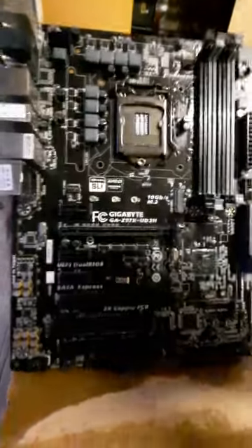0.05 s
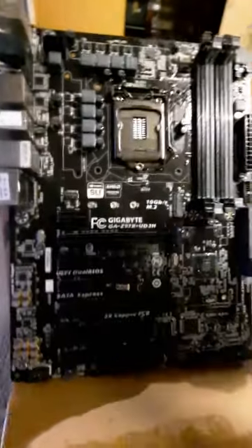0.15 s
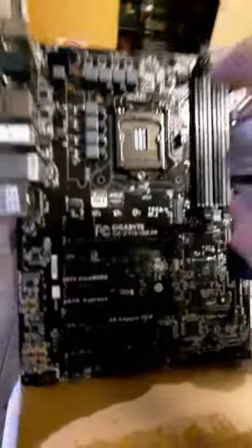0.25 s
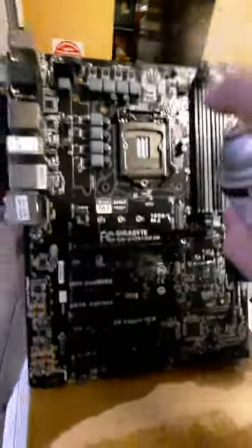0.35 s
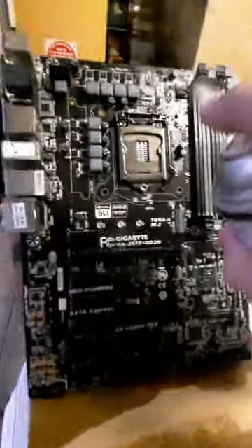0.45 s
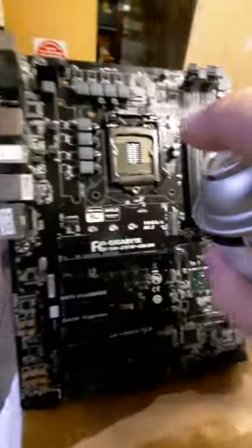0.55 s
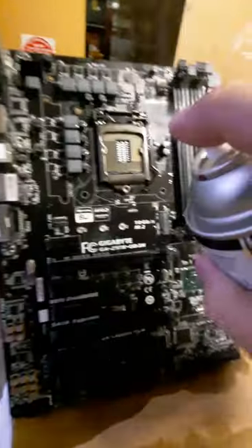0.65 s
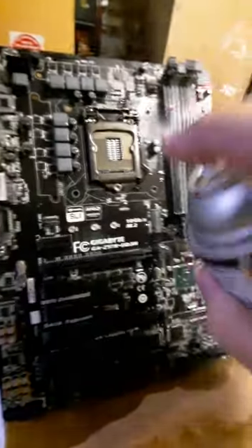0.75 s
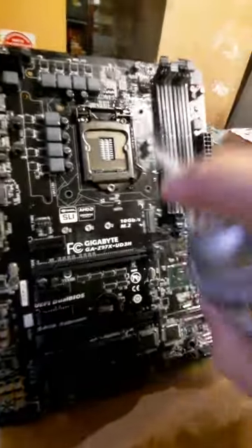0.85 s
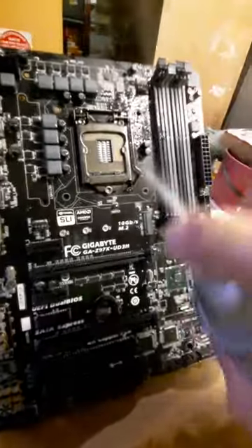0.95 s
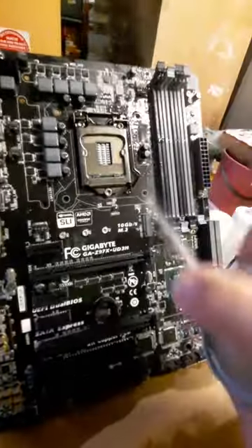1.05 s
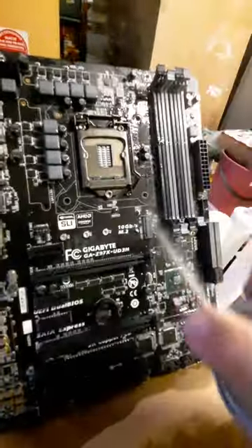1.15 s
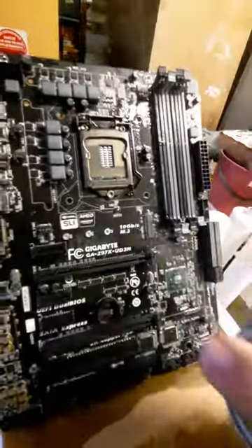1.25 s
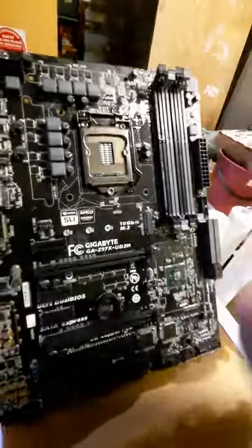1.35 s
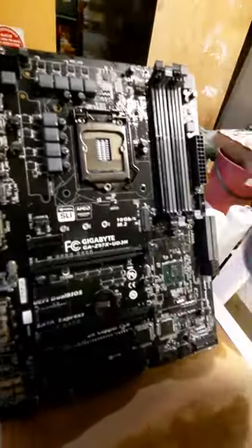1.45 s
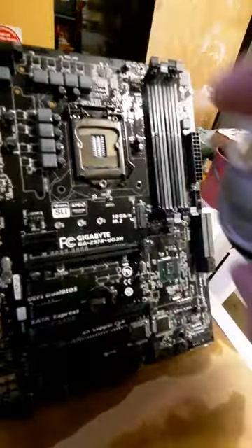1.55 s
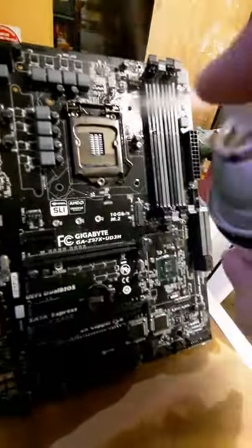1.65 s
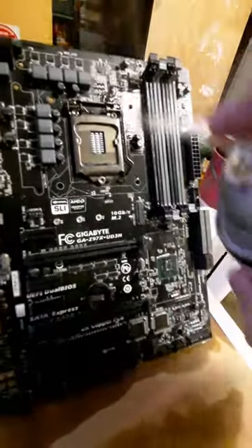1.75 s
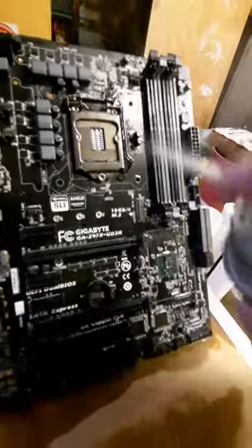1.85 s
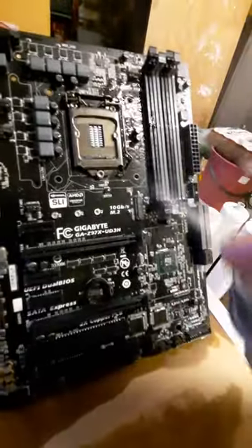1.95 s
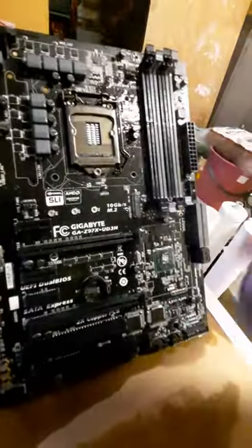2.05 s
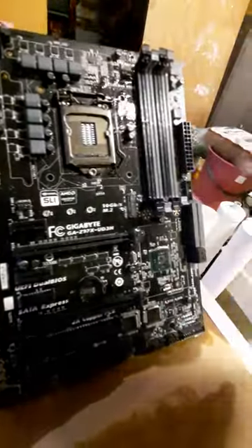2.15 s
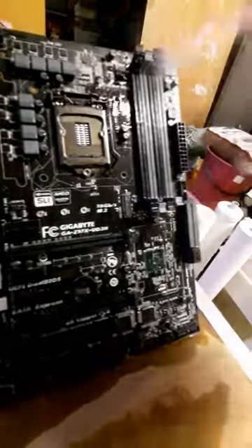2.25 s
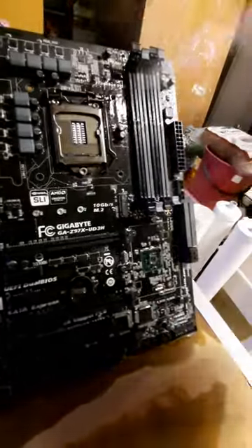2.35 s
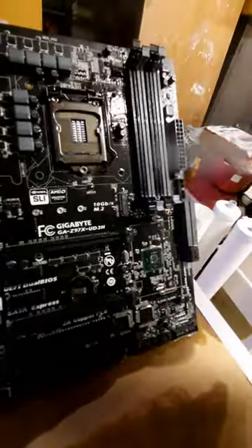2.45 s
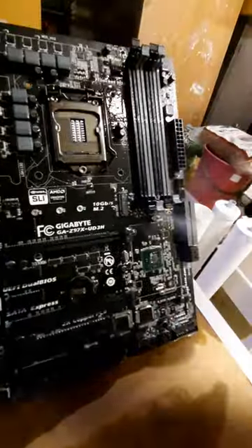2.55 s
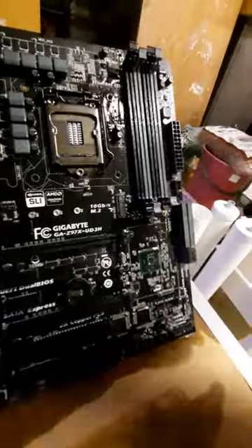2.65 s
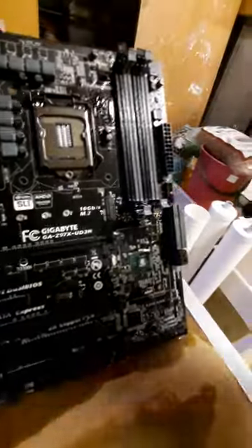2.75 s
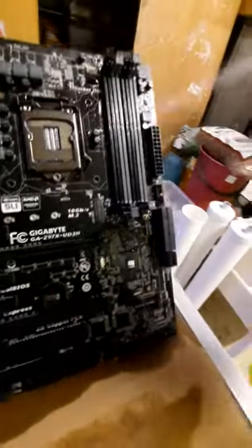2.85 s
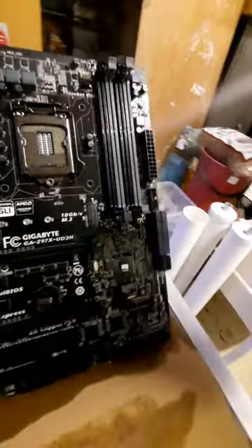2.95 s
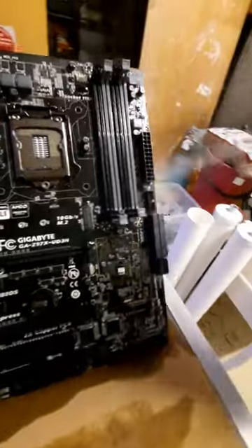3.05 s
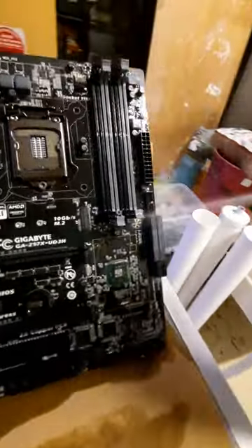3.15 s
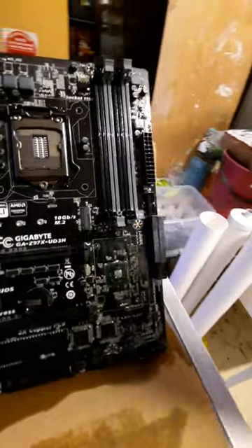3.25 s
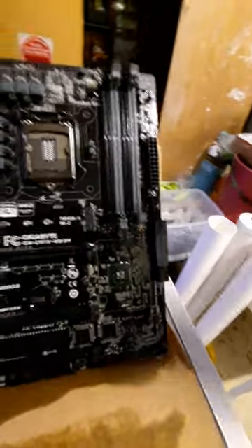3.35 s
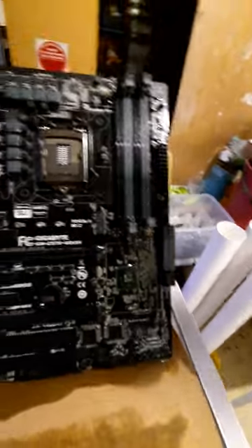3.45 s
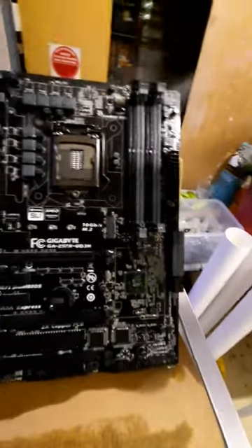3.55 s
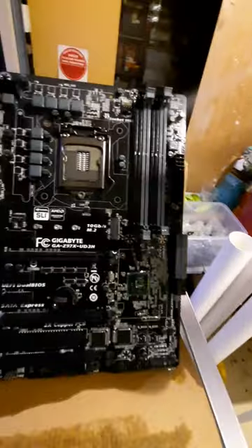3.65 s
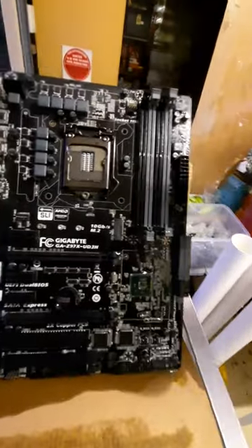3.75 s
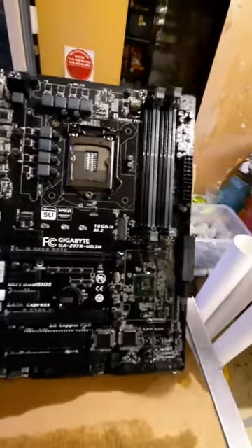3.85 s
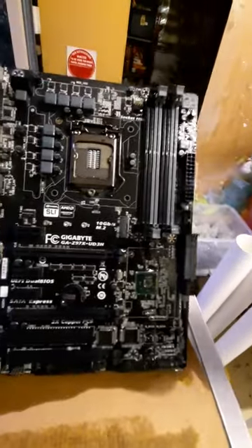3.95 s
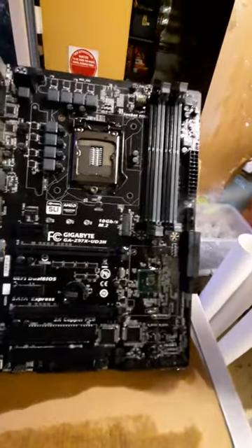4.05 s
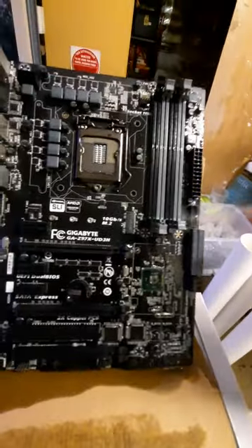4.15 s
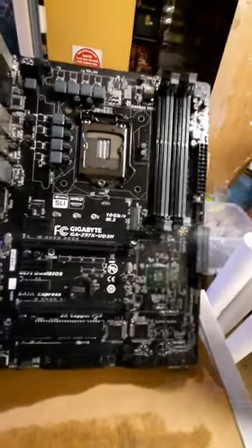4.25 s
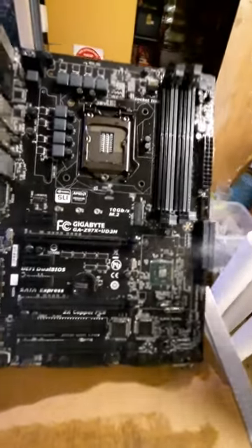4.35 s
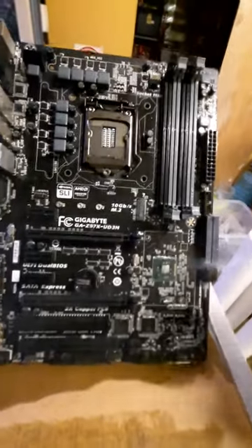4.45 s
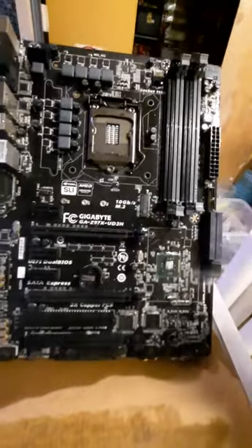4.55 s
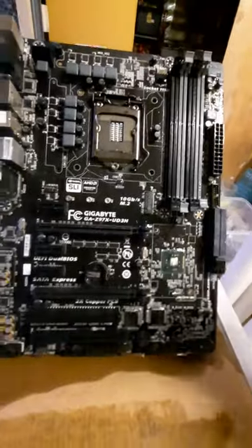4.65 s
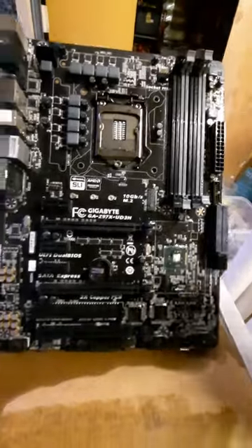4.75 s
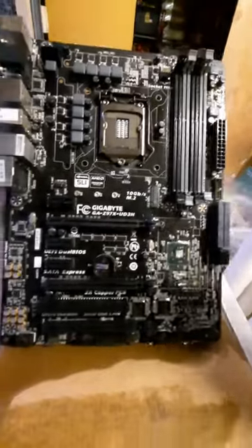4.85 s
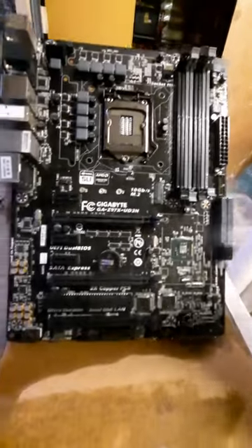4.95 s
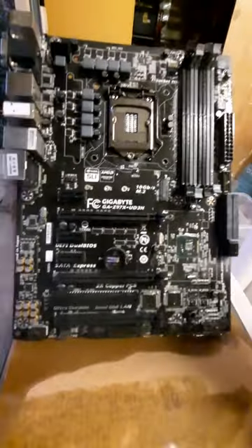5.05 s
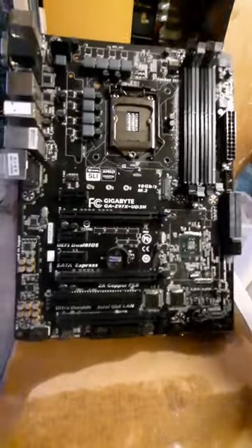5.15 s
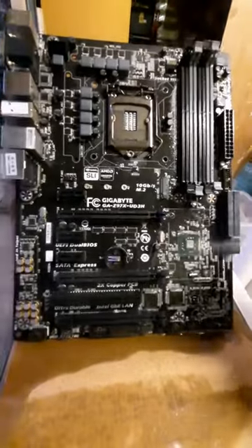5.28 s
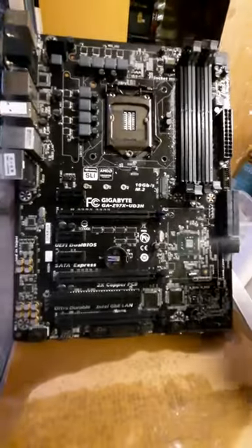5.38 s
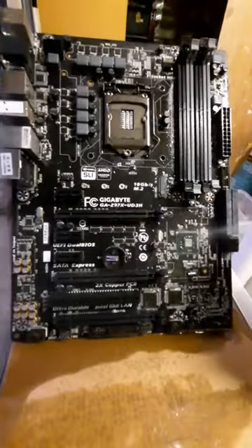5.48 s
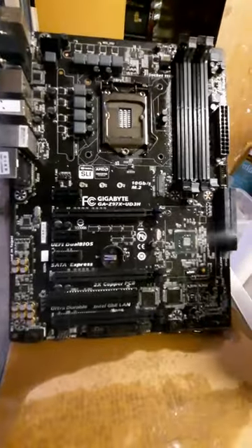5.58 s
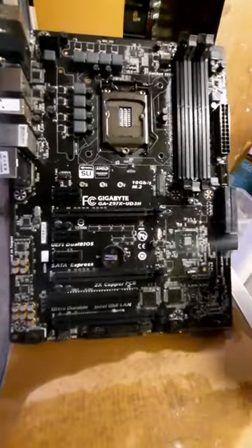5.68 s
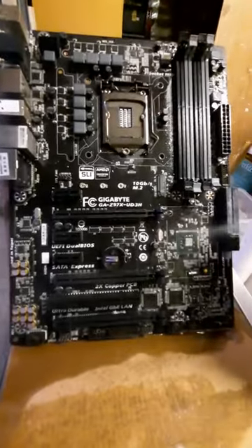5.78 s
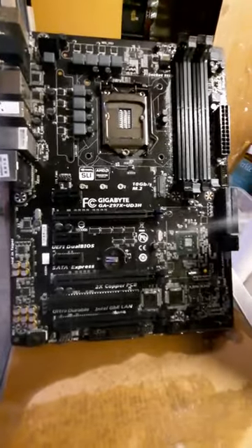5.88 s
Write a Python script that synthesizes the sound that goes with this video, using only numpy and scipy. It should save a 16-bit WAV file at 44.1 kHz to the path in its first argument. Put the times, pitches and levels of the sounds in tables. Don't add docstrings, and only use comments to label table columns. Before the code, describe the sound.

A small indoor workshop, heard closely on a phone in stereo. Soft hum and a dull can knock open the scene, with a sharp button tick at 0.06 s. A tiny puff at 0.26 s runs straight into a long, bright, gritty hiss until 1.26 s. Further bursts follow at about 1.6-2.0 and 2.25-2.6 s, the latter ending in a faint leak and a small distant chirp. Another burst runs 2.9-3.2 s; low and thin squeaks and several clicks fill the pause around 3.2-3.5 s. A long spray lasts 3.55-4.6 s, with a wavering far squeak around 4.0-4.2 s and a reply at 4.55-4.8 s. A short burst comes at 4.83-5.08 s, a click at 5.2 s, then sustained spray from 5.23 s to the end. The airy treble leans right; tone shifts, droplets drum the board, and muffled hand bumps rumble underneath while the background hum quietens.

```python
import sys
import numpy as np
from scipy import signal
from scipy.io import wavfile
from scipy.ndimage import uniform_filter1d, map_coordinates

SR = 44100
rng = np.random.default_rng(int(sys.argv[2]) if len(sys.argv) > 2 else 0)


def ratio_of_db(decibels):
    return 10 ** (np.asarray(decibels, float) / 20)


def inscribe(sig):
    pcm = np.round(np.clip(np.atleast_2d(sig).T, -1, 1) * 32767)
    wavfile.write(sys.argv[1], SR, pcm.astype(np.int16))


N = 261072
T = np.arange(N) / SR
FRAME = 1024
TOP_HZ = 15750

# (open [s], shut [s], opening time [s], flow [dB])
VALVE_OPENINGS = [
    (0.256, 0.287, 0.021, -12),
    (0.285, 1.257, 0.013, -2),
    (1.581, 2.026, 0.022, -0.5),
    (2.25, 2.587, 0.019, -1),
    (2.577, 2.645, .01, -42),
    (2.868, 3.199, 0.018, -0.5),
    (3.55, 4.584, 0.0086, -1),
    (4.832, 5.075, 0.019, -1.5),
    (5.226, 6.5, 0.0076, -1.5),
]
# (frequency [Hz], density [dB per Hz])
SPRAY_SPECTRUM = [(24, -66), (40, -16), (136, -20), (209, -22.5), (311, -10.5), (539, -16), (710, -11),
                  (1060, -13.5), (2140, -8.5), (4200, -10.5), (5960, -6), (9580, -12.5), (12000, 2),
                  (14700, -2.5), (15800, -4)]
# (frequency [Hz], left minus right [dB])
SPRAY_BALANCE = [(200, 0.5), (400, 0), (700, 9), (1300, 5.5), (2400, 0), (4400, 0), (6000, -9.5),
                 (8100, -21), (10000, -19.5), (12000, -12.5), (15000, -4.5)]
# (frequency [Hz], likeness of the channels [-])
SPRAY_COHERENCE = [(200, 1), (600, 1), (1400, 0.54), (3500, 0.49), (6000, 0.33), (9000, 0.39),
                   (12000, 0.44), (15000, 0.3)]
ZONE_CENTRES = [500, 2200, 6000, 12500]
# (time [s], nearness [dB], jet turned to the phone [dB], right port lag [samples])
HAND_PATHS = [
    [(.31, -33, -1, 13.8), (.5, -31, -1, 9.8), (.67, -30, -3.5, 6.1), (.86, -28.5, 0.5, 6.4),
     (1.08, -27.5, -2, 5.5), (1.25, -28, -4.2, 4.6)],
    [(1.61, -32, -3.5, 7.8), (1.8, -30.5, -1, 7.8), (2.03, -32, 0.5, 7.1)],
    [(2.28, -30.5, -5.5, 8.3), (2.42, -30, -6, 9.6), (2.59, -31, 2.5, 4.8)],
    [(2.9, -34.5, -3.5, 10.8), (3.02, -34.5, 0.8, 8.5), (3.2, -35, 4.5, 2.3)],
    [(3.58, -36, 0, 10.3), (3.82, -36.5, 6.5, 7.2), (4.01, -33, 0.5, 4.5), (4.12, -36.5, 8, 3.3),
     (4.28, -35, 4, 3), (4.45, -36.5, 9, 1.7), (4.56, -36, 14, 1.2)],
    [(4.86, -35.5, 3, 5.6), (4.96, -37.5, 10, 4), (5.07, -34.5, 5.5, 1.7)],
    [(5.25, -36, 2, 2), (5.4, -33, -0.8, 2.6), (5.65, -35, 4.5, 2.6), (5.92, -37.5, 7, 2.6)],
]
# (board pocket [Hz], nozzle cup [Hz], jet [Hz])
RESONANCES = [(2090, 6700, 16000), (2570, 6400, 20000), (2410, 6070, 14800), (2280, 5640, 9500),
              (2130, 5660, 10000), (2190, 5400, 12700), (2670, 6560, 13400)]
# (width [octaves], lift [dB])
RESONANCE_PEAKS = [(0.12, 2), (0.089, 4), (0.36, 2.5)]
# (time [s], half width [s], drumming [dB])
BOARD_SPLASHES = [(.65, 0.05, 8.5), (1.07, 0.035, 4.5), (1.24, .03, 1), (1.66, .06, 3), (1.98, 0.049, 4.5),
                  (2.56, 0.051, 1), (3.0, 0.059, 3.5), (3.19, 0.042, 10), (3.78, 0.15, 5.5),
                  (4.01, 0.066, 3.5), (4.2, 0.083, 10), (4.92, 0.16, 5.5), (5.65, 0.38, -3.5),
                  (3.62, .06, -2), (4.5, 0.059, -0.5)]
# (time [s], peak [dB], ring [Hz], T60 [s], left minus right [dB])
BUTTON_TICKS = [(.0613, -39.5, 6740, 0.03, -23), (2.85, -55, 5000, .012, -5), (3.348, -55, 4050, .03, 3),
                (3.468, -50, 11100, 0.042, -20), (3.481, -42.5, 5850, 0.043, -17),
                (3.536, -35, 5200, 0.022, -7), (4.82, -50, 9000, .02, -12),
                (5.214, -45.5, 5000, 0.045, -19)]
# (time [s], peak [dB], ring [Hz], T60 [s], left minus right [dB])
CAN_KNOCKS = [(0.021, -30, 247, 0.087, -0.5), (0.031, -36, 169, 0.11, 4)]
# (time [s], half width [s], deep [dB], upper [dB])
HAND_BUMPS = [(.04, 0.042, 4, 2), (.47, 0.09, 12.5, 7), (.86, 0.041, 5, 2), (1.85, 0.11, 5, 3.5),
              (2.97, 0.091, 6, 7), (3.83, 0.082, 7, 8), (4.14, 0.14, 11, 5.5), (4.4, .04, 5, 1),
              (4.57, 0.043, 1.5, 12), (4.95, 0.035, 2, 4.5), (5.5, 0.057, -3, 4)]
# (time [s], pitch [Hz], level [dB])
FAR_SQUEAKS = [
    [(2.604, 1860, -58), (2.62, 1910, -41), (2.655, 2120, -48), (2.672, 2030, -58), (2.69, 2110, -51),
     (2.73, 2050, -62)],
    [(2.606, 2440, -56), (2.65, 2440, -49), (2.685, 2440, -62)],
    [(3.33, 3100, -64), (3.372, 3122, -50), (3.506, 3210, -48), (3.55, 3260, -56)],
    [(3.91, 2560, -48), (3.96, 2540, -45), (4.04, 2350, -38), (4.065, 2330, -45), (4.085, 2470, -41),
     (4.125, 2620, -46), (4.166, 2437, -37), (4.2, 2270, -40), (4.23, 2212, -55)],
    [(4.425, 2420, -46), (4.46, 2290, -44), (4.535, 2290, -54)],
    [(4.54, 2470, -50), (4.575, 2570, -39), (4.605, 2450, -45), (4.65, 2570, -40), (4.69, 2500, -47),
     (4.755, 2530, -52), (4.775, 2500, -64), (4.84, 2538, -66)],
]
# (time [s], pitch [Hz], level [dB])
FAR_LOW_SQUEAK = [(3.22, 1420, -66), (3.234, 1500, -51), (3.358, 1556, -67), (3.408, 1500, -67),
                  (3.42, 1480, -80)]
# (frequency [Hz], density [dB per Hz])
SHOP_SPECTRUM = [(18, -40), (30, -8), (137, -13), (174, -28), (232, -19.5), (301, -5), (680, -9),
                 (735, -7.5), (838, -4.5), (1490, -6), (1790, -6), (4980, -23), (6480, -21.5), (9600, -29),
                 (15800, -31)]
# (frequency [Hz], left minus right [dB])
SHOP_BALANCE = [(60, 12), (380, -1.5), (700, 3), (1300, -2), (2400, 4.5), (4400, 2), (6000, -10),
                (8000, -22), (15000, -25)]
# (frequency [Hz], likeness of the channels [-])
SHOP_COHERENCE = [(60, 1), (130, 0.77), (290, 1), (640, 0.46), (1410, -0.07), (3100, -1.4), (6820, -0.84),
                  (15000, -0.31)]
# (time [s], level [dB])
SHOP_LOUDNESS = [(0, -42), (1.4, -42.5), (3.5, -45.5), (4.75, -50)]

FACING_SHARE = 0.29, 0.26, .01, 0.89
SPLASH_SHARE = 1.12, 0.23, .01, .01
ZONE_DB = 0.25, 2.8, 3.24, 0.46
MID_LAG = 7.04


def spray():
    hz, s = frame_axes()
    near, facing, bearing = can_position(s)
    zones = near + np.outer(FACING_SHARE, facing) + np.outer(SPLASH_SHARE, swells(s, BOARD_SPLASHES))
    zones = zones + np.array(ZONE_DB)[:, None]
    blend = [np.interp(np.log(hz + 1), np.log(ZONE_CENTRES), w) for w in np.eye(4)]
    db = on_hz(SPRAY_SPECTRUM, hz)[:, None] + np.transpose(blend) @ zones + resonances(hz, s) + 10.41
    slow_tint = 3.38 * patches((2,) + db.shape, frames=14, bins=7)
    quick_tint = 1.09 * patches((2,) + db.shape, frames=3, bins=50)
    treble = np.clip(hz / 12000, 0, 1)[:, None]
    pan_db_per_lag = treble * 0.37 + (1 - treble) * 0.4
    balance = on_hz(SPRAY_BALANCE, hz)[:, None] + pan_db_per_lag * (bearing - MID_LAG)
    drops = ratio_of_db(np.repeat(rng.exponential(size=N // 24 + 1), 24)[:N])
    source = rng.standard_normal((2, N)) * drops / np.sqrt(np.mean(drops ** 2))
    jet = stereo_noise(db + slow_tint + quick_tint, balance, on_hz(SPRAY_COHERENCE, hz), source)
    return reflections(jet) * valve_flow()


def valve_flow(spit=0.072, spit_s=0.038, shut_s=0.013):
    flow = np.zeros(N)
    for start, stop, rise, db in VALVE_OPENINGS:
        surge = 1 + spit * np.exp(-np.abs(T - start) / spit_s)
        opening = np.clip((T - start) / rise, 0, 1)
        closing = np.exp(-np.clip(T - stop, 0, None) / shut_s)
        flow += ratio_of_db(db) * surge * opening * closing
    return flow


def can_position(s):
    rows = np.concatenate(HAND_PATHS)
    return [np.interp(s, rows[:, 0], column) for column in rows[:, 1:].T]


def resonances(hz, s):
    burst = np.clip(np.searchsorted([path[0][0] for path in HAND_PATHS], s + .1) - 1, 0, None)
    bearing = can_position(s)[2] - MID_LAG
    slides = 0.012, -0.0061, 0.011
    lift = 0
    for centre, slide, (width, db) in zip(np.array(RESONANCES)[burst].T, slides, RESONANCE_PEAKS):
        octaves = np.log2((hz[:, None] + 1) / (centre * (1 + slide * bearing)))
        lift = lift + db * np.exp(-.5 * (octaves / width) ** 2)
    return lift


def reflections(x, share=0.15, sway=.1):
    drift = patches((8, 1, N // 441 + 1), frames=50, bins=1)[:, 0]
    drift_s = np.arange(drift.shape[1]) / 100
    out = x.copy()
    for k, delay_ms in enumerate((.27, .43, .61, .95, 1.3, 1.9, 2.6, 3.4)):
        lag = delay_ms * (1 + sway * np.interp(T, drift_s, drift[k])) * SR / 1000
        out[k % 2] += share * late(x[k % 2], lag)
    out[1] = late(out[1], can_position(T)[2])
    return out


def taps(touch_s=0.0012):
    out, t = np.zeros((2, N)), T[:4096]
    for s, db, hz, t60, pan_db in BUTTON_TICKS + CAN_KNOCKS:
        edges = [hz * 0.61, min(hz * 1.54, 15500)]
        sos = signal.butter(2, edges, "band", fs=SR, output="sos")
        scratch = signal.sosfilt(sos, rng.standard_normal(4096))
        decay = np.exp(-np.log(1000) * t / max(t60, .005)) * np.clip(t / touch_s, 0, 1)
        ring = (0.27 * np.sin(2 * np.pi * hz * t) + 0.23 * scratch / scratch.std()) * decay
        at = int(s * SR)
        out[:, at:at + 4096] += ratio_of_db(db + np.array([[pan_db], [-pan_db]]) / 2) * ring
    return out


def rumble(side=0.16):
    flow = np.clip(uniform_filter1d(valve_flow(), size=2205), 0, 1)
    sway = np.repeat(patches((2, 1, N // 441 + 1), frames=8, bins=1)[:, 0], 441, axis=1)[:, :N]
    bumps = swells(T, HAND_BUMPS)
    out = 0
    for k, (edges, drone_db, spray_db) in enumerate((((50, 110), -71.5, 1), ((110, 192), -72, 7.5))):
        db = drone_db + spray_db * flow + bumps[k] + 2 * uniform_filter1d(sway[k], size=441)
        mid, odd = band(rng.standard_normal((2, N)), *edges)
        out = out + ratio_of_db(db) * (mid + side * odd * np.array([[1], [-1]])) / mid.std()
    return out


def squeaks(rough_db=3, wobble=.0025, boost=.4):
    out = np.zeros(N)
    shake = patches((3, 1, N), frames=450, bins=1)[:, 0]
    for rows in FAR_SQUEAKS + [FAR_LOW_SQUEAK]:
        s, hz, db = np.transpose(rows)
        fade = np.clip(np.minimum(T - s[0], s[-1] - T) / 0.0085, 0, 1)
        low = 1700 < hz.mean() < 2300
        force = np.clip((db.max() + 54.5) / 10 + low, 0, 1)
        pitch = np.interp(T, s, hz) * (1 + wobble * (1 + 2 * force) * shake[0])
        tone = np.sin(2 * np.pi * np.cumsum(pitch) / SR)
        fluttering = tone * (1 + boost * force * ratio_of_db(rough_db * shake[2]))
        out += fade * ratio_of_db(np.interp(T, s, db) + rough_db * shake[1]) * fluttering
    return out


def room(x, t60_s=0.24):
    t = T[:SR // 2]
    hiss = rng.standard_normal((2, len(t)))
    dull = signal.sosfilt(signal.butter(1, 5000, fs=SR, output="sos"), hiss)
    tail = dull * np.exp(-np.log(1000) * t / t60_s)
    tail += (hiss - dull) * np.exp(-np.log(1000) * t / (0.3 * t60_s))
    tail *= t > .004
    tail /= np.sqrt(np.sum(tail ** 2, axis=1, keepdims=True))
    return signal.fftconvolve(x, tail, axes=1)[:, :N]


def shop():
    hz, s = frame_axes()
    db = on_hz(SHOP_SPECTRUM, hz)[:, None] + 2 * patches((2, len(hz), len(s)), frames=6, bins=12)
    balance = on_hz(SHOP_BALANCE, hz)[:, None]
    x = stereo_noise(db, balance, on_hz(SHOP_COHERENCE, hz), rng.standard_normal((2, N)))
    return x / x.std() * ratio_of_db(np.interp(T, *np.transpose(SHOP_LOUDNESS)) - 3.5)


def stereo_noise(db, balance_db, coherence, source):
    z = signal.stft(source, SR, nperseg=FRAME)[2]
    c = np.clip(coherence, 0, .99)[:, None]
    mid, side = z[0] * np.sqrt((1 + c) / 2), z[1] * np.sqrt((1 - c) / 2)
    lean = ratio_of_db(balance_db)
    share = np.sqrt(2 / (1 + lean ** 2))
    pair = np.array([(mid + side) * lean * share, (mid - side) * share])
    return signal.istft(pair * ratio_of_db(db), SR, nperseg=FRAME)[1][:, :N]


def frame_axes():
    return signal.stft(np.zeros(N), SR, nperseg=FRAME)[:2]


def on_hz(table, hz):
    f, v = np.transpose(table)
    return np.interp(np.log(np.maximum(hz, 1)), np.log(f), v)


def patches(shape, frames, bins):
    z = rng.standard_normal(shape)
    for _ in range(2):
        z = uniform_filter1d(uniform_filter1d(z, size=frames, axis=-1), size=bins, axis=-2)
    return z / z.std()


def swells(s, rows):
    rows = np.array(rows)
    return rows[:, 2:].T @ np.exp(-.5 * ((s - rows[:, :1]) / rows[:, 1:2]) ** 2)


def band(x, low_hz, high_hz):
    return signal.sosfilt(signal.butter(3, [low_hz, high_hz], "band", fs=SR, output="sos"), x)


def late(x, lag):
    return map_coordinates(x, [np.arange(N) - lag], order=3)


def scene():
    near = band(spray(), 193, 19000) + taps()
    squeak = squeaks()
    far = np.array([ratio_of_db(4.5) * squeak, ratio_of_db(-3.5) * late(squeak, 2)])
    direct = near + ratio_of_db(.5) * far
    echoes = ratio_of_db(-13.5) * room(near) + ratio_of_db(-6) * room(far)
    return direct + echoes + band(shop(), 150, 21000) + rumble()


def starve(x, mid_db=-3.5, left_db=-20.5, right_db=-21, whim_db=4.5):
    hz, s, z = signal.stft(x, SR, nperseg=2048, noverlap=1536)
    z = z * (hz < TOP_HZ)[:, None]
    edge = np.r_[np.arange(96, 240, 7), np.arange(240, 760, 12)]
    slot = np.clip(np.searchsorted(edge, np.arange(len(hz))) - 1, 0, len(edge) - 1)
    live = (hz > 2100)[:, None]
    whim = ratio_of_db(whim_db * patches((3, len(edge), len(s)), frames=4, bins=1))[:, slot] ** 2

    def power(v):
        bands = np.add.reduceat(np.abs(v) ** 2, edge, axis=0) / np.diff(edge, append=len(hz))[:, None]
        return uniform_filter1d(bands, size=5, axis=1)[slot]

    mid, side = (z[0] + z[1]) / 2, (z[0] - z[1]) / 2
    masked = power(mid) < ratio_of_db(mid_db) ** 2 * power(side) * whim[0] ** .3
    mid = mid * ~(live & (hz < 5700)[:, None] & masked)
    left, right = mid + side, mid - side
    loud = np.percentile(np.abs(right[:740]) ** 2, 90, axis=0)
    left = left * ~(live & (power(left) < ratio_of_db(left_db) ** 2 * power(right) * whim[1]))
    masked = power(right) < ratio_of_db(right_db) ** 2 * loud * whim[2]
    right = right * ~(live & (hz < 10500)[:, None] & (loud > loud.mean() / 20) & masked)
    return signal.istft(np.array([left, right]), SR, nperseg=2048, noverlap=1536)[1][:, :N]


def low_pass(x):
    return signal.sosfilt(signal.butter(12, 16990, fs=SR, output="sos"), x)


def record(dry):
    rounded = np.tanh(1.555 * dry) / 1.628
    top = signal.ellip(10, .2, 70, TOP_HZ, fs=SR, output="sos")
    mix = starve(signal.sosfilt(top, rounded))
    return low_pass(mix)


dry = scene()
out = record(dry)
inscribe(out)
```